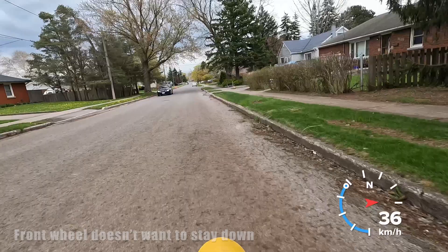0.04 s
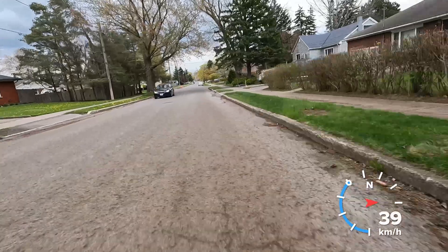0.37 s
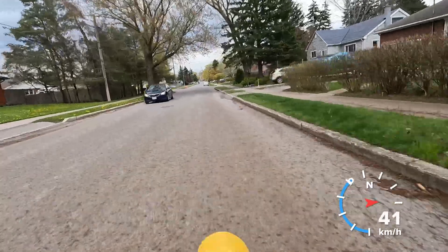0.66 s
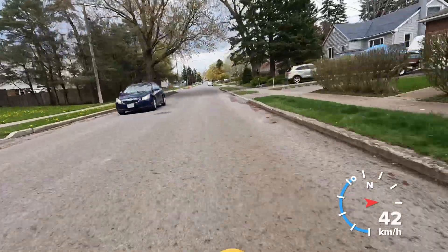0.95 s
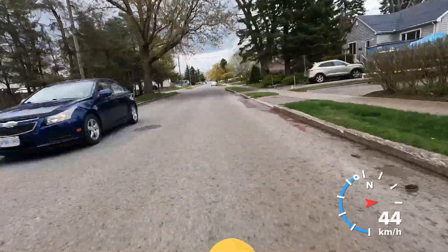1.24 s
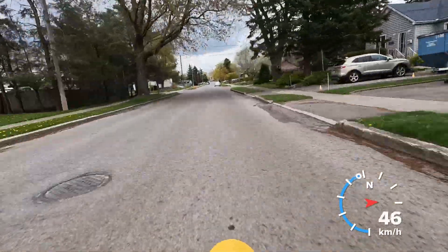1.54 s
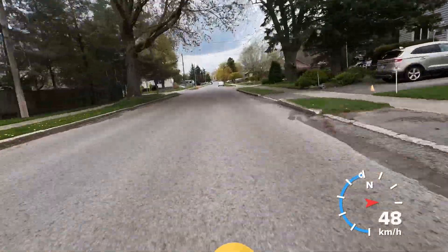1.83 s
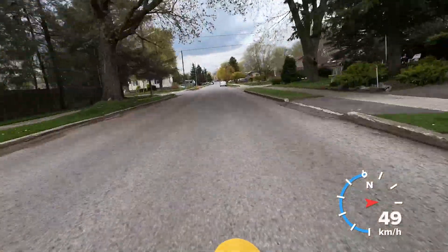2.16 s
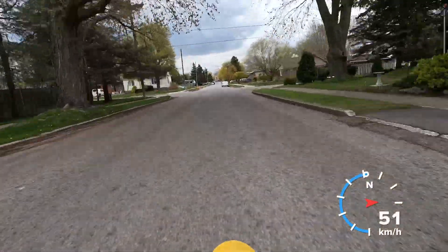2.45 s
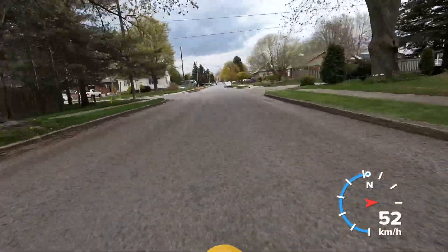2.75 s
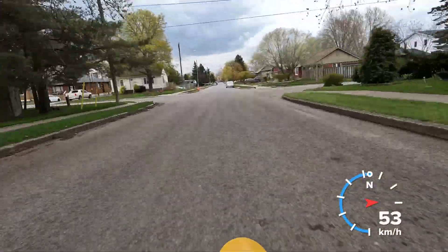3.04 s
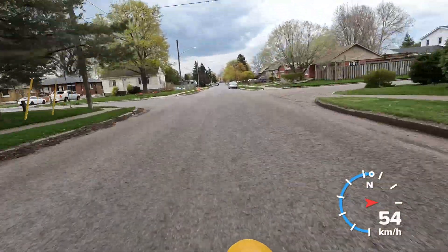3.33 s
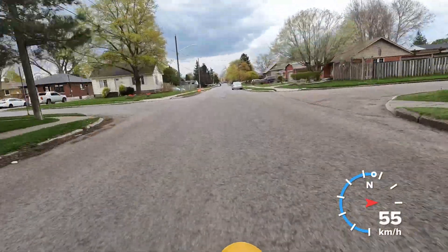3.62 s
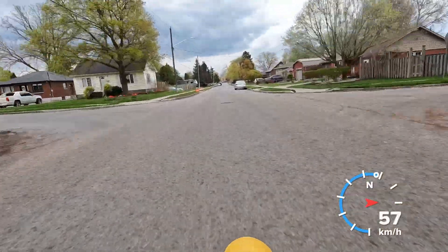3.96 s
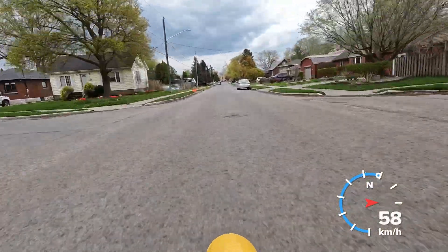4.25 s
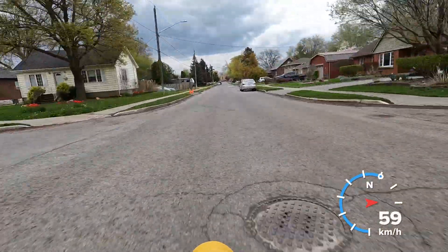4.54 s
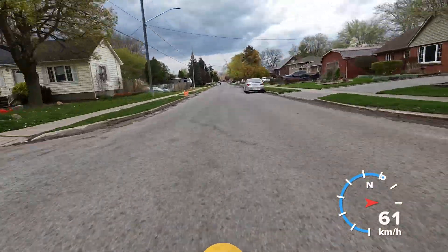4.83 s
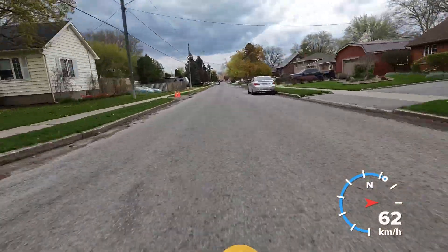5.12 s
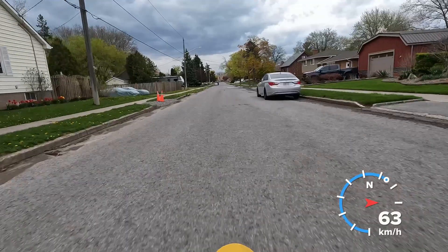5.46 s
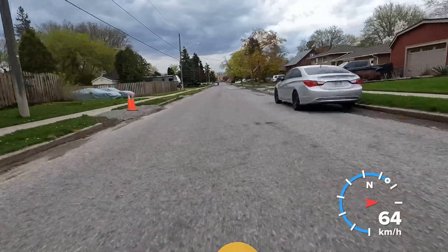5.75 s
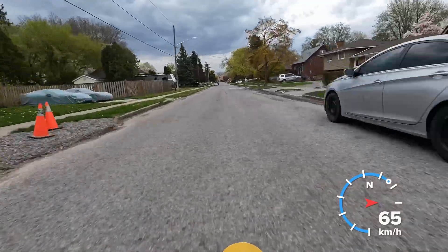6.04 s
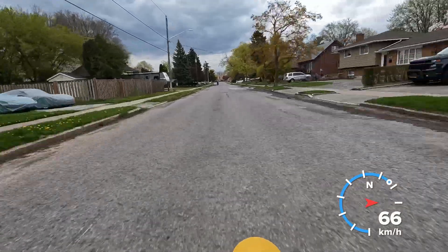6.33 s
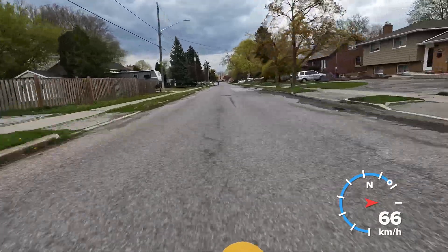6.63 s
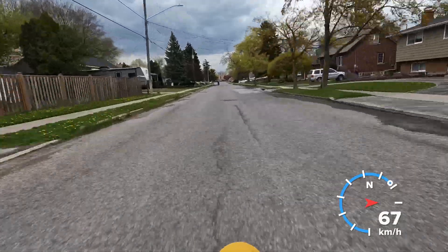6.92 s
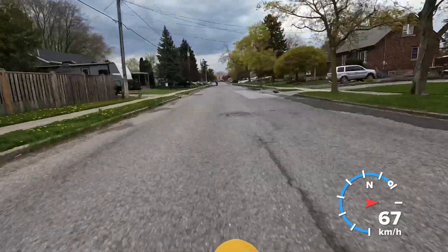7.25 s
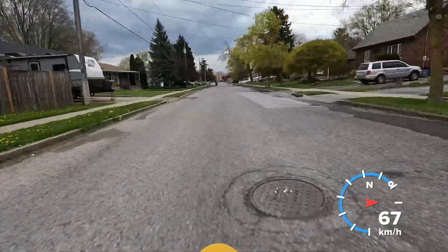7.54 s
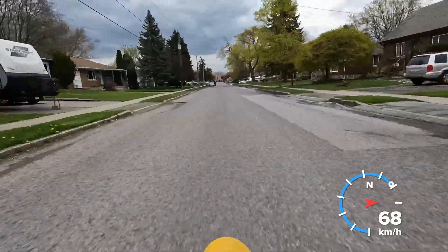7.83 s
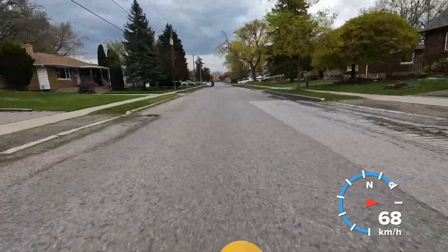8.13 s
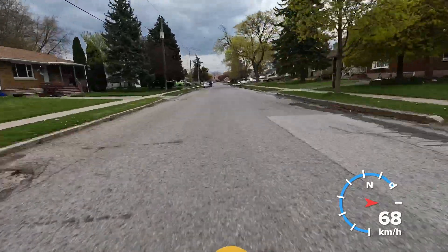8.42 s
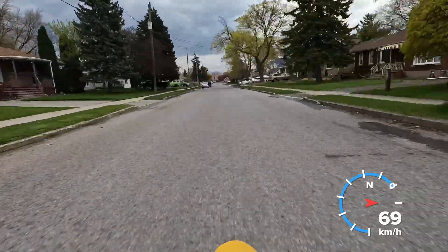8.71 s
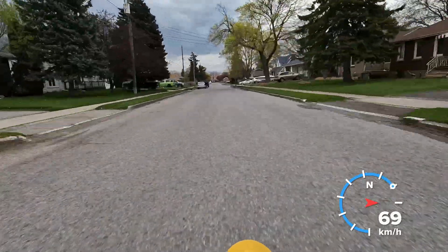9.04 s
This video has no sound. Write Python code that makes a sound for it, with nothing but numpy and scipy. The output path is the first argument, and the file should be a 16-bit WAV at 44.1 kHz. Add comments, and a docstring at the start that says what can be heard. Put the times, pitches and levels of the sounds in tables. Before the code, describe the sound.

An electric motorbike accelerates along a street, heard from the rider's seat. Its knobby tyres howl and its motor whines, climbing steadily in pitch over road roar and heavy wind buffeting the microphone. Early on, bumps rattle the frame, grit ticks and an oncoming car passes briefly. Later the whine surges twice on rougher road, and the air hisses louder as the pitch levels off.

```python
"""An electric motorbike nearly doubles its speed along a street, heard from the rider's seat.
From the start two knobby tyres howl and beat against each other, the hub motor whines near their octave,
asphalt grain rings the tyres and roars, and wind buffets the microphone. In the first two seconds rough
road breaks up the howl, bumps rattle the frame, grit ticks and a car passes. Near 5 s and 8 s the road
roughens again and the whine surges, while the air hisses ever louder. A limiter holds the peaks."""
import sys
import numpy as np
from scipy import signal
from scipy.fft import rfft, irfft
from scipy.io import wavfile
from scipy.ndimage import uniform_filter1d, minimum_filter1d

SR = 44100
rng = np.random.default_rng(int(sys.argv[2]) if len(sys.argv) > 2 else 0)


def transcribe(signal):
    """Save signal, clipped to [-1, 1], as a 16-bit WAV file at the path in sys.argv[1]."""
    frames = np.atleast_2d(signal).T
    limited = np.clip(frames, -1, 1)
    pcm = np.round(limited * 32767).astype(np.int16)
    wavfile.write(sys.argv[1], SR, pcm)


N = 409248


def undb(db):
    """Decibels to gain."""
    return 10 ** (np.asarray(db) / 20)


def unit(x):
    """Scale to rms 1."""
    return x / np.sqrt(np.mean(x ** 2))


def curves(table):
    """Each column of a table, joined by straight lines in time."""
    s, *columns = np.transpose(table)
    return [np.interp(np.arange(N) / SR, s, c) for c in columns]


def swells(table, steepness=2.75):
    """One envelope per value column: each (centre, length, values...) row rises, holds and falls."""
    t = np.arange(0, N / SR, .004)
    columns = sum(np.outer(np.exp(-np.abs(2 * (t - s) / length_s) ** steepness), values)
                  for s, length_s, *values in table)
    return curves(np.column_stack([t, columns]))


def walk(rate_hz):
    """Smooth random wander with spread 1, up to about the given rate."""
    f = np.arange(N // 2 + 1) * SR / N
    return unit(irfft(rfft(rng.standard_normal(N)) / (1 + (f / rate_hz) ** 2), N))


def shaped_noise(spectrum, band_hz):
    """Noise through an EQ curve, with rms 1 inside the band."""
    f = np.maximum(np.arange(N // 2 + 1) * SR / N, 1)
    hz, db = np.transpose(spectrum)
    shaped = rfft(rng.standard_normal(N)) * undb(np.interp(np.log(f), np.log(hz), db))
    shaped = shaped * np.minimum(f / hz[0], 1) ** 2 * np.minimum(hz[-1] / f, 1) ** 2
    inside = irfft(shaped * ((f > band_hz[0]) & (f < band_hz[1])), N)
    return irfft(shaped, N) / np.std(inside)


def ring(x, hz, width_hz):
    """A resonance applied twice, for steep skirts."""
    b, a = signal.iirpeak(hz, hz / (0.89 * width_hz), fs=SR)
    return signal.lfilter(b, a, signal.lfilter(b, a, x))


def boost_db(hz, modes):
    """Lift of a tone as it glides through resonances."""
    return sum(db / (1 + (2 * (hz - centre_hz) / width_hz) ** 2) for centre_hz, width_hz, db in modes)


def turn(hz):
    """Running phase of a rate."""
    return 2 * np.pi * np.cumsum(hz) / SR


def tone(phase, rough, width_hz):
    """A tone of rms 1 whose level and phase are shaken into a narrow skirt."""
    shake = rough * (walk(width_hz) + 1j * walk(width_hz))
    return unit(np.real((1 + shake) * np.exp(1j * phase)))


def wobbling(hz, octaves, cruise_share=.0006, db_per_octave=-28):
    """A wheel's spin wavers as its tyre bounces, less at speed."""
    return hz * (1 + cruise_share * undb(db_per_octave * octaves) * walk(rate_hz=8.99))


# Rougher and smoother road: (centre [s], length [s], howl dip [dB], rasp lift [dB], judder [0-1],
# scrub lift [dB], roar lift [dB])
ROUGH_PATCHES = [(.08, 0.22, 7.5, -6, 0.8, -1, 0), (.34, 0.28, 6.5, 4, 0.2, 9.5, 1),
                 (.72, 0.14, -0.5, 9, 0.2, 4.5, 3), (.91, 0.12, -4.5, -9.5, 0.02, -4.5, -3.5),
                 (1.06, .09, 0, -2, 0.2, 3.5, 0.5), (1.21, .11, 12.5, -5, 0, 1, -5),
                 (1.655, .08, 4.5, 2, .4, 0, 0), (1.85, .3, 0, -1, 0.22, 0, 1.5),
                 (5.07, 0.55, 11, 2, 0.08, 2.5, 2.5), (5.34, 0.28, 5, 4.5, 0.3, -5, 1),
                 (5.75, 0.64, 2.5, -2.5, 0.1, -3, .5), (7.3, 0.57, 2.5, 6.5, 0.02, 9.5, 0),
                 (7.94, 0.29, 11, 6.5, 0.1, -3, 1.5)]
# Surfaces that sharpen or soften the tread's slap: (centre [s], length [s], rear octave lift [dB],
# rear slap lift [dB], front slap lift [dB], roar lift [dB])
SURFACES = [(.92, .2, 1.5, 1, -4.5, 2), (1.2, 0.19, -8, -6.5, 6.5, 2), (1.47, 0.43, 6, 1, -8.5, 0.5),
            (1.88, 0.2, -0.5, 3.5, -7, -2), (2.42, 0.41, 4.5, 4.5, -2, 2.6), (3.35, 0.44, 2, -4, -3, -0.5),
            (4.22, 0.53, 6.5, 6.5, 4, 1.5), (4.63, 0.35, 6, 0, -6, -2), (5.0, 0.46, 12, -5, -5, -0.5),
            (5.45, .35, -2, -0.5, 3.5, 1.5), (6.1, 0.58, 0.5, 3, -2, 1.1), (6.55, 0.33, -1, 3, 4, 3),
            (7.35, 1.5, -5.5, -4.5, -6, 1.5), (8.75, 1, 2, -4.5, 1.5, 1.1)]
# The rear howl, fullest near the ring of the tyre's air: (block rate [Hz], level [dB])
HOWL_RESPONSE = [(226, -17), (242, -22.5), (248, -13), (280, -9), (302, -14), (352, -15.5), (400, -17.5),
                 (420, -16.5)]
# Bike resonances that the tyres' overtones sweep through: (pitch [Hz], width [Hz], lift [dB])
BODY_MODES = [(452, 35, 7.5), (655, 50, 1.5), (910, 68, 2.5), (1250, 87, 3), (1842, 110, 7.5)]
def rear_tyre(block_hz, octaves, slap_offset_db=-24.5, cruise_judder=0.031):
    """Tread blocks drum on the road: a howl with slapping overtones, juddering most at low speed."""
    dip_db, _, patch_judder, _, _ = swells(ROUGH_PATCHES)
    octave_lift_db, slap_lift_db, _, _ = swells(SURFACES)
    phase = turn(wobbling(block_hz, octaves))
    judder = patch_judder + cruise_judder - .05 * octaves
    howl_db = np.interp(block_hz, *np.transpose(HOWL_RESPONSE))
    howl = undb(howl_db - dip_db) * tone(phase, rough=judder, width_hz=14)
    octave_db = -38 - 4 * octaves + octave_lift_db + boost_db(2 * block_hz, BODY_MODES)
    overtones = undb(octave_db) * tone(2 * phase, rough=0.044 + judder, width_hz=8.8)
    slap_db = howl_db + slap_offset_db + octaves + slap_lift_db + 1.5 * walk(rate_hz=8.2)
    for order, db in zip(range(3, 7), (2.5, -6.0, -9.5, -12.5)):
        gain = undb(slap_db + db + boost_db(order * block_hz, BODY_MODES))
        smear = order * (0.1 + 0.57 * judder)  # uneven timing smears the high overtones most
        overtones += gain * tone(order * phase, rough=smear, width_hz=30)
    return howl + overtones


# The front tyre sings out and overruns as its load changes:
# (centre [s], length [s], level [dB], extra speed [share of rear rate])
FRONT_BURSTS = [(0.038, 0.083, -26, 0.036), (0.342, 0.1, -24, 0.063), (0.553, 0.26, -14.5, 0.0172),
                (0.769, 0.13, -10, 0.018), (1.128, 0.057, -14.5, 0.0042), (1.335, 0.14, -20, 0.0039),
                (1.695, 0.16, -22, .01), (2.1, 0.21, -22, 0.00043), (5.3, 0.089, -25.5, 0),
                (7.899, 0.14, -31.5, 0.07), (8.02, 0.13, -27, 0.00015)]
def front_tyre(block_hz, octaves, rate_ratio=1.061, cruise_db=-29, db_per_octave=22):
    """A slightly faster tread beats against the rear one; the lightly loaded wheel sings less evenly."""
    bursts, overrun = swells([(s, length_s, undb(db), extra) for s, length_s, db, extra in FRONT_BURSTS])
    _, _, slap_lift_db, _ = swells(SURFACES)
    front_hz = block_hz * (rate_ratio + overrun)
    phase = turn(wobbling(front_hz, octaves))
    howl = (undb(cruise_db + db_per_octave * octaves) + bursts) * tone(phase, rough=0.18, width_hz=12)
    overtones = undb(-19) * bursts * tone(2 * phase, rough=.3, width_hz=19)
    slap_db = -37.5 + 6.5 * octaves + slap_lift_db
    for order, db in zip(range(2, 6), (-1.5, 1.0, -12.5, -14.0)):
        gain = undb(slap_db + db + boost_db(order * front_hz, BODY_MODES))
        overtones += gain * tone(order * phase, rough=.58, width_hz=30)
    return howl + overtones


def tread_rasp(phase, base_db=-30):
    """On coarse patches the blocks land unevenly and the howl turns into a rasp."""
    _, rasp_lift_db, *_ = swells(ROUGH_PATCHES)
    low = tone(1.05 * phase, rough=1.6, width_hz=56)
    octave = tone(1.97 * phase, rough=15, width_hz=92)
    return undb(base_db + rasp_lift_db) * (low + undb(-3.5) * octave)


def tread_scrub(phase, pull, full_pull_db=-33.5, db_per_doubling=3.5):
    """Each block slips a little as it leaves the road, more while the drive pulls hard."""
    *_, scrub_lift_db, _ = swells(ROUGH_PATCHES)
    slip = rng.standard_normal(N) * (1 + .5 * np.cos(phase))
    scrub = unit(ring(slip, hz=1055, width_hz=350))
    return undb(full_pull_db + db_per_doubling * pull + scrub_lift_db) * scrub


# The ring of the motor's side covers: (pitch [Hz], width [Hz], lift [dB])
COVER_MODES = [(468, 30, 17.5), (761, 74, 10.5)]
# The whine swells and eases: (centre [s], length [s], lift [dB])
WHINE_SURGES = [(4.66, .24, 6.5), (5.02, 0.5, 13.5), (6.15, 0.91, 1), (6.95, 0.41, -2), (7.96, 0.11, 12),
                (9.0, .9, -9)]
def hub_motor(block_hz, octaves, ripple_per_block=1.917, base_db=-42, db_per_octave=8):
    """Torque ripple sings in the motor's side covers, with a weak octave."""
    ripple_hz = ripple_per_block * block_hz
    phase = turn(ripple_hz)
    surge_db, = swells(WHINE_SURGES)
    whine = tone(phase, rough=0.13, width_hz=28) + undb(-22) * tone(2 * phase, rough=0.25, width_hz=21)
    return undb(base_db + db_per_octave * octaves + boost_db(ripple_hz, COVER_MODES) + surge_db) * whine


# The hollow ring of the air in the tyres: (pitch [Hz], width [Hz], level [dB])
CAVITY_MODES = [(267.5, 54, 6), (282.5, 83, -5)]
def tyre_cavity(grain, pull, full_pull_db=-22.5, db_per_doubling=6.5):
    """Asphalt grain rings the air in the tyres, more under pull and on rasping patches."""
    _, rasp_lift_db, *_ = swells(ROUGH_PATCHES)
    cavity = unit(sum(undb(db) * ring(grain, hz, width_hz) for hz, width_hz, db in CAVITY_MODES))
    return undb(full_pull_db + db_per_doubling * pull + 0.26 * rasp_lift_db) * cavity


# Low thumps in the frame: (centre [s], length [s], level [dB])
THUMPS = [(0.045, 0.14, -21), (0.334, 0.19, -20.5), (0.678, 0.33, -22.5), (1.367, 0.33, -23),
          (1.701, .35, -29.5), (2.501, 0.44, -29), (7.046, .3, -26)]
def frame_drum(grain):
    """Asphalt grain drums the frame as the wheels skip."""
    envelope, = swells([(s, length_s, undb(db)) for s, length_s, db in THUMPS])
    return envelope * unit(ring(grain, hz=161.8, width_hz=33))


# The colour of tyres on asphalt: (frequency [Hz], level [dB])
ROAR_EQ = [(300, -15), (500, -5), (650, 2), (820, 3.5), (1020, -3), (1320, 2.5), (1560, -5), (1800, -4.5),
           (2050, -8), (2500, -7.5), (2950, -13.5), (3400, -23), (4300, -45), (7000, -58)]
def road_roar(octaves, cruise_db=-36, db_per_octave=4):
    """Asphalt grain roars from the contact patches, shifting with the surface."""
    *_, rough_db = swells(ROUGH_PATCHES)
    *_, surface_db = swells(SURFACES)
    roar_db = cruise_db + db_per_octave * octaves + rough_db + surface_db
    return shaped_noise(ROAR_EQ, band_hz=(1500, 2800)) * undb(roar_db + 1.3 * walk(rate_hz=120))


# The wind's low rumble: (frequency [Hz], level [dB])
BUFFET_EQ = [(7, -4.5), (24, 0), (55, 0), (120, -3.5), (165, -8.5), (230, -10.5), (330, -15.5),
             (500, -22.5), (1000, -43)]
# Gusts and lulls: (centre [s], length [s], lift [dB])
GUSTS = [(.1, 0.23, -1), (.82, 0.58, -3.5), (1.5, 0.7, -4.5), (2.05, 0.19, 0.5), (2.9, 0.45, 0),
         (4.65, 0.41, -2), (7.6, 0.3, 0.5)]
def wind_buffet(octaves, cruise_db=-17.5, db_per_octave=2.5):
    """Eddies thump on the microphone."""
    gust_db, = swells(GUSTS)
    buffet_db = cruise_db + db_per_octave * octaves + gust_db
    return shaped_noise(BUFFET_EQ, band_hz=(20, 140)) * undb(buffet_db + 0.41 * walk(rate_hz=10))


# The bright, airy top: (frequency [Hz], level [dB])
HISS_EQ = [(1500, -4.5), (3000, 5.5), (3900, 4.5), (4400, 0), (5500, -4), (7200, -8.5), (7900, -15.5),
           (8600, -26), (9300, -26.5), (11000, -27.5), (13000, -39.5)]
def air_hiss(octaves, cruise_db=-56.5, db_per_octave=28.5, floor_db=-64):
    """Fast air hisses past the microphone; the level flickers and lifts with the rough road's roar."""
    *_, roar_lift_db = swells(ROUGH_PATCHES)
    airflow = np.hypot(undb(floor_db), undb(cruise_db + db_per_octave * octaves))
    hiss = shaped_noise(HISS_EQ, band_hz=(4200, 7500))
    return airflow * hiss * undb(.6 * roar_lift_db + 1.7 * walk(rate_hz=150))


def edge_whistle(octaves, cruise_db=-58, db_per_octave=46):
    """Air whistles thinly over an edge, growing steeply with speed."""
    whistle = unit(ring(rng.standard_normal(N), hz=3860, width_hz=220))
    return undb(cruise_db + db_per_octave * octaves) * whistle


# The upper-mid bite of the fittings: (frequency [Hz], level [dB])
RATTLE_EQ = [(900, -5), (1400, 1.5), (1900, 1), (2600, -4), (3400, -19.5), (4500, -35), (7000, -50)]
# Bumps in the road: (time [s], level [dB])
BUMPS = [(0.685, -37), (.750, -30), (1.056, -35), (1.255, -34), (1.622, -33), (1.701, -34), (1.865, -33),
         (2.072, -31), (4.924, -39), (7.853, -34)]
def clatter(attack_s=0.0042, decay_s=0.023):
    """Each bump shakes the frame and its fittings into a short, dry rattle."""
    rattle = shaped_noise(RATTLE_EQ, band_hz=(1000, 3200))
    age = np.arange(SR // 5) / SR
    hit = (1 - np.exp(-age / attack_s)) * np.exp(-age / decay_s)
    envelope = np.zeros(N)
    for s, db in BUMPS:
        start = int(s * SR)
        envelope[start:start + len(age)] += undb(db) * hit / hit.max()
    return envelope * rattle


# Bright ticks of grit: (time [s], pitch [Hz], level [dB])
GRIT_TICKS = [(.856, 5750, -42.5), (.871, 6120, -52), (.962, 5860, -56), (1.058, 6460, -54),
              (1.507, 6500, -54), (3.709, 5430, -49)]
def grit(attack_s=.0006, ping_s=0.0051, crack_s=0.012, crack_db=-9):
    """Small stones flicked against the metal frame: a short ping over a crack."""
    out = np.zeros(N)
    noise = undb(crack_db) * unit(ring(rng.standard_normal(N), hz=5000, width_hz=1900))
    age = np.arange(SR // 10) / SR
    for s, hz, db in GRIT_TICKS:
        start = int(s * SR)
        span = slice(start, start + len(age))
        ping = np.exp(-age / ping_s) * np.sin(2 * np.pi * hz * age)
        crack = np.exp(-age / crack_s) * noise[span]
        out[span] += undb(db) * (1 - np.exp(-age / attack_s)) * (ping + crack)
    return out


def oncoming_car(nearest_s=1.235, roar_s=0.055, hiss_s=0.43):
    """Its tyres roar briefly and hiss a little longer, fading with distance."""
    t = np.arange(N) / SR - nearest_s
    roar = undb(-38.5) * shaped_noise(ROAR_EQ, band_hz=(1500, 2800))
    hiss = undb(-64) * shaped_noise(HISS_EQ, band_hz=(4200, 7500))
    return roar / np.hypot(1, t / roar_s) + hiss / np.hypot(1, t / hiss_s)


# The long climb in pitch, as rear tread blocks meet the road: (time [s], block rate [Hz])
BLOCK_RATE = [(0.0, 220.8), (0.25, 226), (0.4, 234), (0.85, 248.5), (1.05, 251.5), (1.15, 263), (1.3, 271),
              (1.62, 281.5), (1.72, 289), (2.0, 301), (2.4, 316.6), (2.8, 329), (3.05, 337.8), (3.2, 341.7),
              (3.6, 351.6), (3.9, 357.8), (4.25, 366.8), (4.7, 373.4), (4.95, 379.5), (5.12, 382),
              (5.27, 381.5), (5.45, 386.5), (5.7, 390.8), (6.15, 398.5), (6.7, 402.8), (7.15, 406.8),
              (7.4, 410.8), (7.7, 410.8), (8.1, 414.6), (8.8, 420.3), (9.28, 421.2)]
def scene(cruise_hz=420, full_pull_hz_per_s=40):
    """One road speed drives both tyres and the motor; its rise tells how hard the drive pulls."""
    block_hz, = curves(BLOCK_RATE)
    phase = turn(block_hz)
    octaves = np.log2(block_hz / cruise_hz)  # speed, in doublings from cruising
    climb_hz_per_s = uniform_filter1d(np.gradient(block_hz) * SR, size=SR)
    pull = np.log2(np.maximum(climb_hz_per_s, 2) / full_pull_hz_per_s)  # in doublings from full pull
    howl = rear_tyre(block_hz, octaves) + front_tyre(block_hz, octaves)
    tread = tread_rasp(phase) + tread_scrub(phase, pull)
    whine = hub_motor(block_hz, octaves)
    grain = rng.standard_normal(N)  # the same asphalt shakes tyres and frame
    road = tyre_cavity(grain, pull) + frame_drum(grain) + road_roar(octaves)
    hits = grit() + clatter()
    wind = wind_buffet(octaves) + air_hiss(octaves) + edge_whistle(octaves)
    return (howl + tread + whine + road + wind + hits + oncoming_car())[None]


def record(dry, ceiling=0.56, hold_s=0.046, ratio=6, top_hz=12800):
    """A look-ahead limiter turns the loudest peaks down; a steep low-pass cuts the top."""
    size = int(hold_s * SR) + 1
    gain = np.minimum(1, ceiling / (np.abs(dry) + 1e-9)) ** (1 - 1 / ratio)
    limited = dry * uniform_filter1d(minimum_filter1d(gain, size), size)
    fade_in = np.minimum(1, np.arange(N) / SR / .004)
    low_pass = signal.ellip(8, .2, 70, top_hz, fs=SR, output="sos")
    return signal.sosfilt(low_pass, limited * fade_in)


dry = scene()
out = record(dry)
transcribe(out)
```